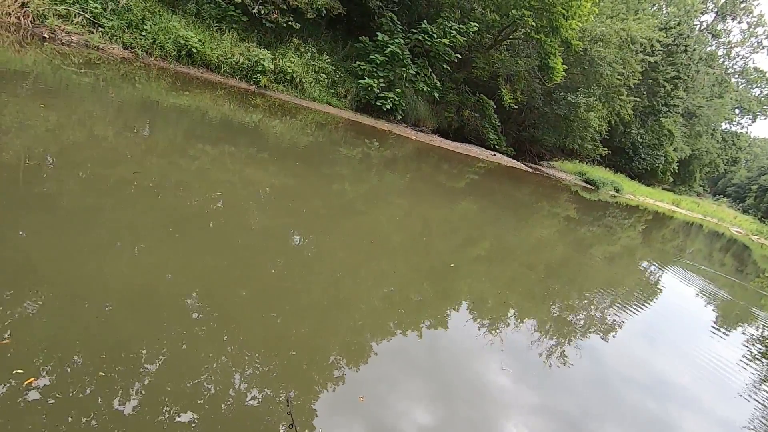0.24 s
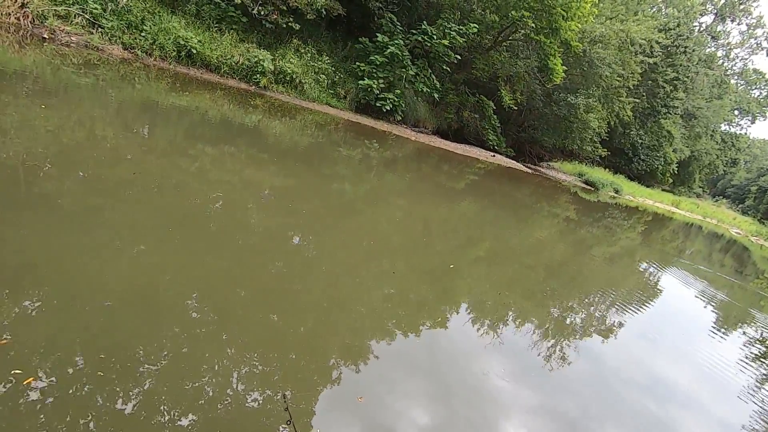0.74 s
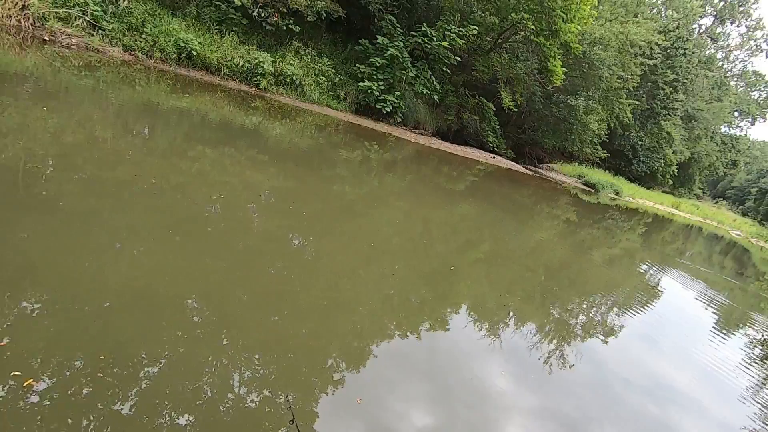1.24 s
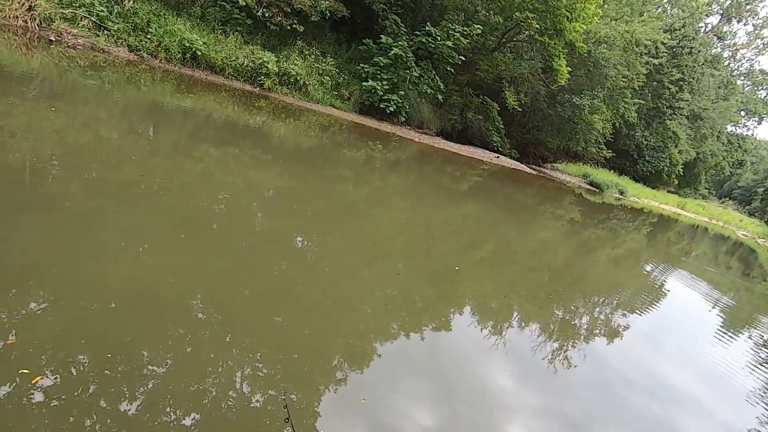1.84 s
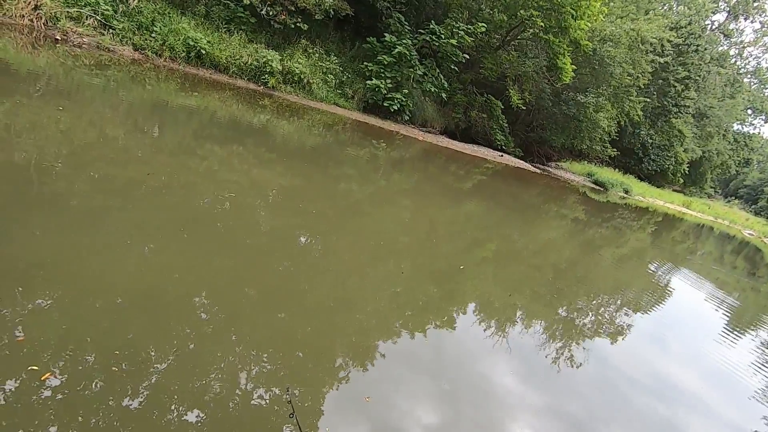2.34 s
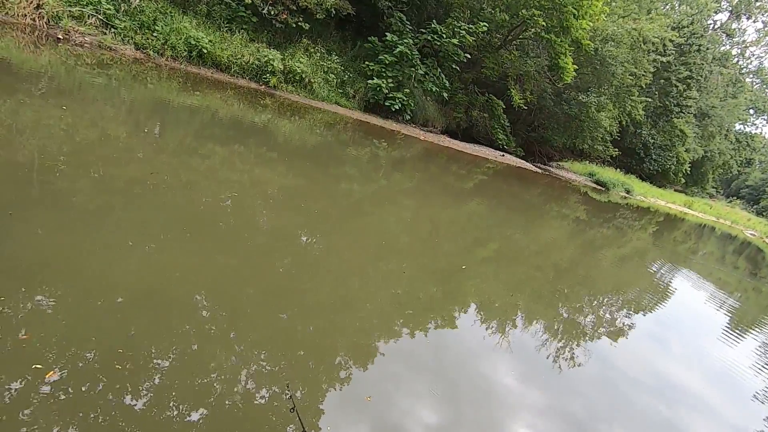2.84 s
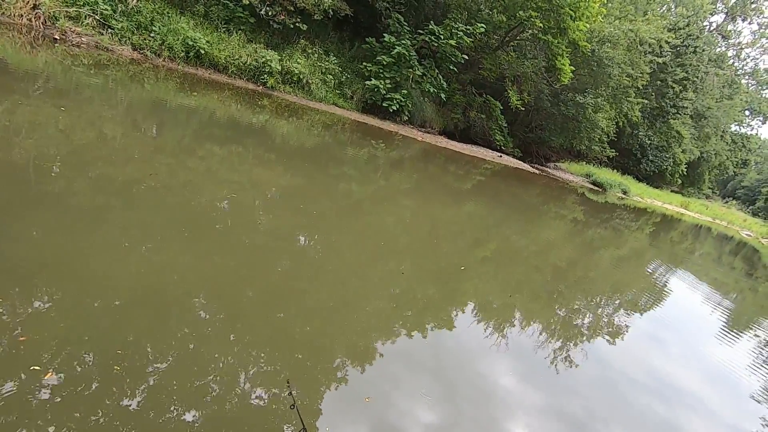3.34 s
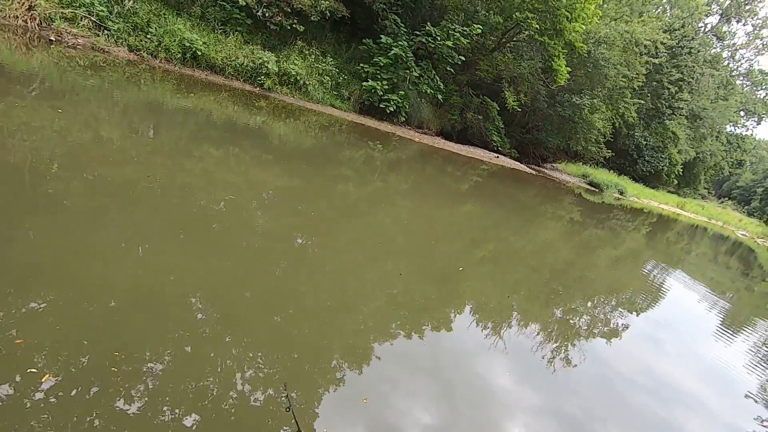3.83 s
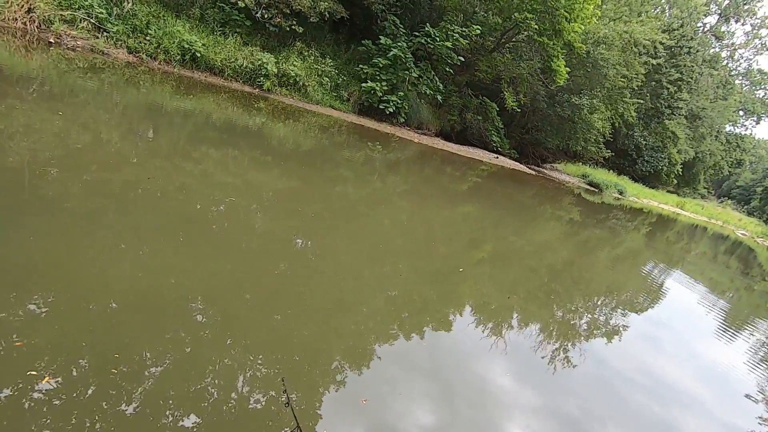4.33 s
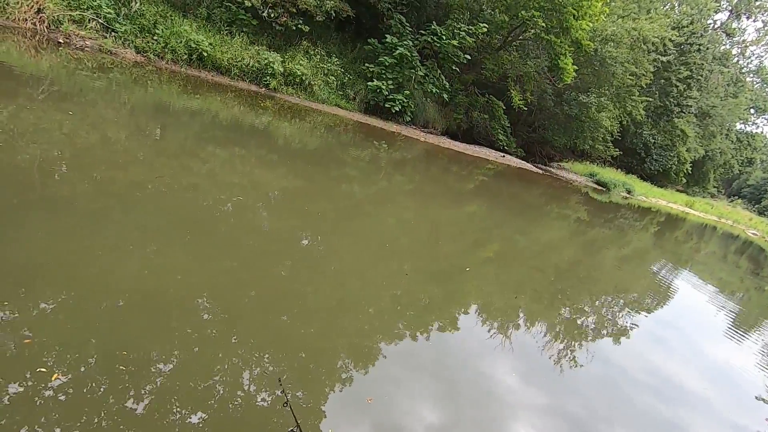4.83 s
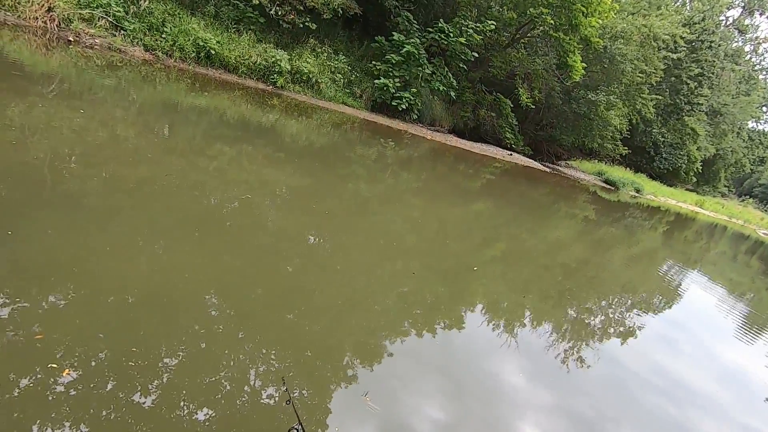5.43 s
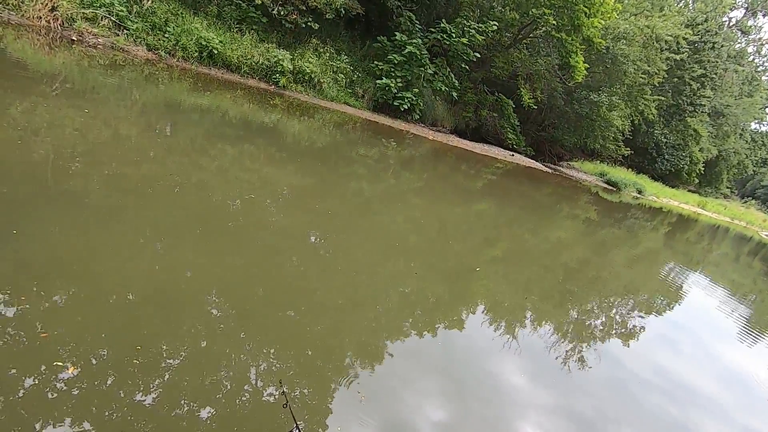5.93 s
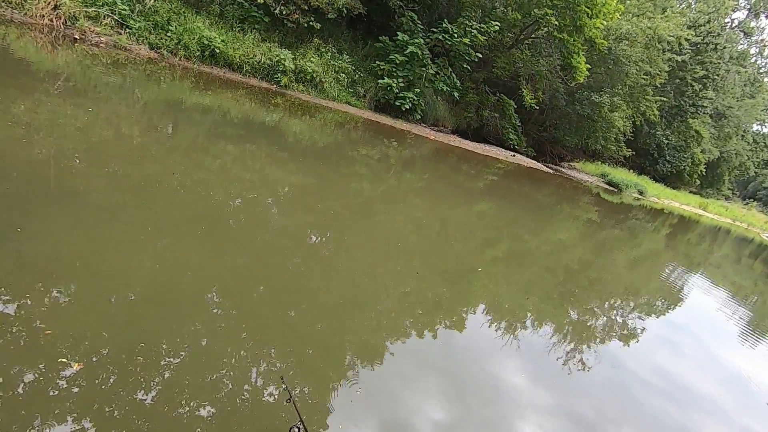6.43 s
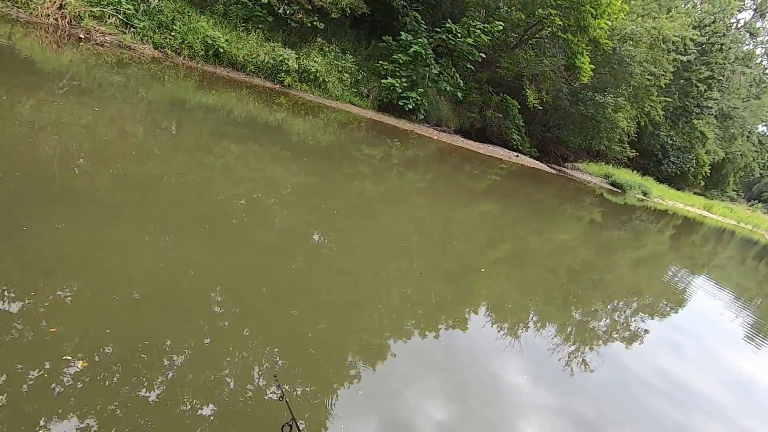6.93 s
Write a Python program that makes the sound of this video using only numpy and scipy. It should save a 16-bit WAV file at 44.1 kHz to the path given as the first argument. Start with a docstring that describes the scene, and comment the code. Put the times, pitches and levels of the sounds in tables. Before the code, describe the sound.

Steady high insect drone on a summer bank, with three raspy katydid buzzes, small bird whistles, a faint plop and a tiny tackle tick.

```python
"""Summer afternoon by a creek

A dense choir of crickets drones near 7.5 kHz, made of bands of noise that throb with the wing strokes.
A near katydid ticks and buzzes in bursts of noise; far katydids make a flickering hiss.
Small birds call in gliding sine tones, and a plop and a tiny tick are short sine tones too.
Far motors hum in wavering sines under the soft noise of breeze, rumble, roar and leaves.
Two closely spaced microphone ports hear it all, each a little differently."""
import sys
import numpy as np
from scipy import signal
from scipy.fft import rfft, irfft, next_fast_len
from scipy.io import wavfile
from scipy.ndimage import uniform_filter1d

SR = 44100
rng = np.random.default_rng(int(sys.argv[2]) if len(sys.argv) > 2 else 0)


def wav_record(signal):
    """Record a signal, one row per channel, as 16-bit PCM in the file named by sys.argv[1]."""
    frames = np.transpose(np.atleast_2d(signal))
    bounded = np.clip(frames, -1, 1)
    # unit amplitude maps onto the largest positive 16-bit level
    quanta = np.round(bounded * 32767).astype(np.int16)
    wavfile.write(sys.argv[1], SR, quanta)


N = 316197
TIME_S = np.arange(N) / SR
FFT_SIZE = next_fast_len(N)
HZ = np.maximum(np.fft.rfftfreq(FFT_SIZE, 1 / SR), 1)   # frequencies of the spectrum; 1 Hz at least

# In every spectrum below, each row: frequency in Hz, relative level in dB per Hz.

# How the two ports differ. Each row: frequency in Hz, likeness from 0 to 1,
# phase by which left leads in radians, left minus right in dB.
PORTS = [(25, 0.7, 1, -8), (105, 0.6, 1, 0), (335, 0.67, -0.4, -1.5), (745, 0.17, 0.93, -0.5),
         (1420, 0.37, 3, 3.5), (1980, 0.07, 5.5, 0.5), (2740, 0.48, 6.5, 0.5), (3570, 0.22, 7.5, 0),
         (3620, 0.2, 10, -1.5), (4570, 0.6, 6.5, 0), (5500, 0.22, 8.5, 2), (6300, 0.1, 10, 0),
         (7510, 0.37, 9.5, -1), (8350, 0.52, 9.5, -1.5), (8430, 0.32, 8.5, -1), (9080, 0.48, 9, -3),
         (10000, 0.45, 6, -1), (9970, 0.25, 8.5, 5), (11300, 0.4, 10.5, -3), (13200, 0.1, 15, 2),
         (14800, 0.5, 7, 1)]
ECHO_T60_S = .3   # echoes among the trunks fall 60 dB in this time

# Breeze on the ports: its spectrum, then its level. Each level row: time in s, level in dB.
BREEZE_SPECTRUM = [(12, -10), (24, -7), (35, 4), (50, -3), (80, -5)]
BREEZE_LEVEL = [(0, -74), (.7, -76), (1.4, -72), (3.4, -74), (4.4, -78), (5.7, -78), (6.6, -74),
                (7.17, -75)]
# Lumpy low rumble: its spectrum, then its level. Each level row: time in s, level in dB.
RUMBLE_SPECTRUM = [(40, -15), (70, -29), (130, -5.5), (200, 2), (260, -6), (380, -9.5), (600, -42)]
RUMBLE_LEVEL = [(0, -64.5), (.8, -66), (1.6, -64), (3.0, -63.5), (4.1, -61), (4.5, -63), (5.2, -64),
                (5.45, -59), (5.68, -55.5), (5.85, -63.5), (6.3, -60.5), (6.9, -64), (7.17, -60)]
# Far roar: its spectrum, then its swells. Each swell row: middle in s, spread in s, rise in dB.
ROAR_SPECTRUM = [(250, -10.5), (420, -3.5), (550, -2), (750, 1), (950, -3.5), (1300, -8.5), (2000, -42)]
ROAR_SWELLS = [(0.243, .15, 1), (1.53, 0.051, 2.5), (2.07, 0.059, 4), (2.817, 0.013, 6.5), (3.578, 0.07, 3),
               (3.99, 0.037, 3.5), (5.45, 0.085, 3.5), (5.617, 0.061, 1.5), (6.31, 0.036, 4),
               (6.698, .04, 2.5)]
ROAR_DB, ROAR_FOLLOWS = -63, 0.029   # mean level before the swells; share of the rumble's swings
# Spectrum of the rustling leaves.
RUSTLE_SPECTRUM = [(500, -11), (1000, -2), (1400, 2.5), (2280, -2), (3300, -1), (3850, 2.5), (4300, -2.5),
                   (4700, -4), (5600, -2.5), (6500, -16), (8000, -25)]
RUSTLE_DB, RUSTLE_RISE_DB_PER_S = -63, 0.39   # level at the start; the leaves slowly stir more
# Strongest puffs of air on the ports. Each row: middle in s, pitch in Hz, strength in dB.
THUDS = [(.4, 22, -61), (.88, 28, -59), (1.26, 22, -55), (1.52, 25, -55), (1.63, 27, -64), (2.32, 22, -65),
         (2.87, 25, -64), (3.32, 22, -57), (3.43, 22, -58), (3.76, 27, -58), (4.1, 22, -60),
         (4.73, 24, -61), (5.21, 32, -61), (5.35, 28, -66), (6.24, 27, -61)]
THUD_S = 0.043   # spread of each puff

# Plain motor tones. Each row: pitch in Hz, pitch waver in Hz, level waver in dB,
# level at the start in dB, change in dB per s.
HUM = [(183.8, 2.4, 4.5, -73.5, 0.5)]
# Level of a lower motor that fades away. Each row: time in s, level in dB.
LOW_HUM_LEVEL = [(0, -70.5), (.4, -70), (.65, -65.5), (1.0, -69.5), (1.65, -67), (2.15, -70), (2.65, -66),
                 (3.4, -78.5), (4.5, -73.5), (5.5, -85), (7.17, -84)]
LOW_HUM_HZ, LOW_HUM_WAVER_HZ, LOW_HUM_WAVER_DB = 106.4, 0.7, 2.0
# Level of a thin high motor tone. Each row: time in s, level in dB.
HIGH_HUM_LEVEL = [(0, -70.5), (.35, -71.5), (.75, -86), (1.0, -75), (1.6, -76), (1.85, -82), (2.15, -83),
                  (2.5, -82), (7.17, -87)]
HIGH_HUM_HZ, HIGH_HUM_WAVER_HZ, HIGH_HUM_WAVER_DB = 462, 1.0, 1.2
# Level of the loudest motor. Each row: time in s, level in dB.
DRONE_LEVEL = [(0, -69.5), (1.0, -72.5), (1.3, -60), (2.15, -66), (2.7, -62.5), (3.6, -61), (4.1, -58),
               (5.4, -59.5), (6.4, -64.5), (6.8, -69.5), (7.17, -67)]
DRONE_HZ, DRONE_WAVER_HZ, DRONE_WAVER_DB = 156.6, 0.27, 2
# Tones of a chugging engine. Each row: multiple of its cycle, relative level in dB.
CHUG_ORDERS = [(5.0, -7), (6.0, 0), (7.0, -4)]
# Level shared by those tones. Each row: time in s, level in dB.
CHUG_LEVEL = [(0, -77), (1.4, -68), (2.4, -79), (3.4, -81), (4.6, -74), (6.0, -83), (6.5, -73.5),
              (6.85, -65.5), (7.17, -71.5)]
CYCLE_HZ, CYCLE_WAVER_HZ = 13.0, 0.048

# Small plop in the water: start in s, length in s, first pitch in Hz, last pitch in Hz, level in dB.
PLOP = (6.03, 0.05, 620, 900, -62)
# Plop at the ports. Each row: pitch in Hz, phase by which left leads in radians, left minus right in dB.
PLOP_PORTS = [(620, .8, 0), (900, 1.1, 0)]
# Faint tick of the tackle, to the right: middle in s, pitch in Hz, spread in s,
# left peak in dB, right peak in dB.
TACKLE = (6.8125, 4850, .0012, -62, -55)

# Far katydids, lower singers. Each row: time in s, level in dB.
FAR_KATYDID_LEVEL = [(0, -65), (.3, -68), (.9, -70), (2.1, -65.5), (2.35, -69.5), (2.54, -74), (2.8, -69),
                     (3.07, -65.5), (3.3, -67), (3.45, -74), (4.0, -70), (5.0, -68.5), (7.17, -70)]
# Spectrum of all the far katydids.
FAR_KATYDID_SPECTRUM = [(9300, -29), (9800, -7), (10600, 4.5), (11000, -1), (11800, 2.5), (12600, -2.5),
                        (13600, -4), (14800, -31)]
HIGHER_DB, HIGHER_FOLLOW = -70, 0.54   # higher singers: mean level, share of the lower ones' swings

# Steady peeps of a far bird. Each row: start in s, length in s, first pitch in Hz,
# last pitch in Hz, level in dB.
PEEPS = [(3.425, .06, 4690, 4685, -74), (3.487, .045, 4695, 4680, -71), (3.548, .03, 4880, 4890, -75),
         (3.6, .09, 4893, 4898, -65.5), (4.294, .028, 4825, 4840, -68.5)]
RISE_SHARE, FALL_SHARE, EDGE_DB = .4, .25, -10   # fade in and out over these shares of the length
# A falling chip. Each row: time in s, pitch in Hz, level in dB.
CHIP = [(2.401, 6150, -70), (2.406, 5930, -60), (2.412, 5620, -58), (2.42, 5200, -54), (2.425, 4880, -59),
        (2.429, 4420, -64), (2.433, 4000, -74)]
# Another bird's song of two joined notes, one list per note. Each row: time in s, pitch in Hz, level in dB.
SONG = [
    [(6.114, 3980, -70), (6.126, 4300, -67), (6.14, 4540, -67), (6.155, 4630, -59), (6.168, 4420, -63),
     (6.18, 4100, -68), (6.184, 4500, -74), (6.2, 4520, -69), (6.215, 4420, -72)],
    [(6.217, 4180, -68), (6.23, 4430, -64), (6.25, 4655, -57), (6.265, 4735, -63), (6.29, 4755, -68.5),
     (6.32, 4760, -71), (6.355, 4770, -67), (6.395, 4640, -72), (6.415, 4252, -73), (6.432, 4040, -66),
     (6.447, 3960, -67), (6.462, 3800, -64), (6.48, 3745, -64), (6.525, 3725, -63), (6.565, 3773, -63),
     (6.595, 3897, -69), (6.63, 4050, -65), (6.66, 4095, -66), (6.72, 4105, -71), (6.765, 4200, -70),
     (6.795, 4230, -68.5), (6.85, 4225, -73), (6.93, 4260, -80)],
]
# Peeps, chip and song at the ports. Each row: pitch in Hz, phase by which left leads in radians,
# left minus right in dB.
PEEP_PORTS = [(4690, 1, 9), (4890, .5, 4)]
CHIP_PORTS = [(4000, -1.6, -2), (5000, -2.2, -2), (6200, -1.9, -3)]
SONG_PORTS = [(3730, 2.3, 3), (3800, 2.5, -3), (3950, 3.9, 0), (4060, 4.7, 5), (4210, 6.5, 4),
              (4430, 5.0, 0), (4620, 7.3, 4.5), (4770, 4.9, 7)]

# Single ticks of the near katydid. Each row: middle in s, level in dB, extra treble in dB.
TICKS = [(.817, -62, 0), (.885, -57, 1), (.95, -56, 0), (1.018, -58, 0), (2.451, -67, -2), (2.521, -64, 0),
         (2.76, -69, 0), (2.846, -69, 0), (3.481, -61, 0), (3.55, -56.5, -1), (3.618, -55.5, -2),
         (3.688, -57, 0), (5.55, -71, 3), (5.792, -58.5, -5), (5.853, -57, -4), (5.913, -58, -5)]
TICK_TREBLE_HZ = 11300   # a tick's treble starts here
# Long buzzes. Each row: start in s, end in s, level in dB before strokes and fades,
# wing resonance in Hz.
BUZZES = [(1.063, 2.05, -56.5, 10500), (3.753, 4.933, -56.5, 10600), (5.938, 7.097, -57, 10550)]
# Spectrum of the katydid's wing.
WING_SPECTRUM = [(9000, -8), (9400, -1), (9700, -11), (10050, 1), (10400, -1), (10900, -0.5), (11300, -3.5),
                 (11700, -8), (12300, -5.5), (13000, -8), (13900, -13), (14800, -49)]
SWELL_DB, SWELL_S, STOP_S = 14, 0.09, 0.024   # start this much softer, swell time constant, stopping time
STROKES_PER_S, TIRE_PER_S, TIRE_S, TIRE_DB = 47.8, 2.0, .15, 1.5   # wings slow and soften near the end
RING_HZ_WIDE, RING_DB = 70, 6   # spread and height of the wing resonance

# Cricket choir. Each row: time in s, level in dB.
CHOIR_LEVEL = [(0, -39.5), (3.0, -40), (3.2, -39), (3.6, -40), (5.2, -39), (6.8, -39.5), (7.17, -38.5)]
# Spectrum of the cricket choir.
CHOIR_SPECTRUM = [(5800, -33), (6320, -24), (6700, -13), (7060, -1.5), (7300, 2.5), (7550, 3), (7780, 5.5),
                  (7960, 0), (8080, -5), (8230, -3.5), (8450, -13), (8800, -13.5), (9100, -17),
                  (9300, -34.5), (9600, -46)]
CHIRP_HZ, CHIRP_WAVER_HZ = 47, 0.8   # wing strokes per second that the singers share

# Spectrum of the microphone hiss.
MIC_HISS_SPECTRUM = [(8000, -5), (12000, -3), (14500, 18), (17000, -21)]
MIC_HISS_DB, CUTOFF_HZ = -81.5, 15750


def amp(db):
    """Turn dB into a plain gain."""
    return 10 ** (np.asarray(db) / 20)


def in_time(rows):
    """Draw each column of a time table as a curve with a value at every sample."""
    s, *columns = np.transpose(rows)
    return [np.interp(TIME_S, s, column) for column in columns]


def on_hz(points):
    """Draw each column of a frequency table as a curve over log frequency."""
    hz, *columns = np.transpose(points)
    return [np.interp(np.log(HZ), np.log(hz), column) for column in columns]


def closed(points):
    """Gain of a spectrum that is silent outside its ends."""
    return amp(on_hz(points)[0]) * (HZ >= points[0][0]) * (HZ <= points[-1][0])


def drift(rate):
    """Smoothed chance wandering around 0 with spread 1; a higher rate (Hz) wanders faster."""
    step = 40   # worked out once per 40 samples, then joined by straight lines
    pole = np.exp(-2 * step * np.pi * rate / SR)
    chance = rng.standard_normal(N // step + 2002)
    slow = signal.lfilter([1], [1, -2 * pole, pole * pole], chance)[2000:]   # skip the filter's start
    return np.interp(np.arange(N) / step, np.arange(len(slow)), slow / slow.std())


def strokes(per_s, depth, start):
    """Wing strokes as a throbbing gain: depth 0 is steady, 1 falls silent between strokes."""
    depth = np.clip(depth, 0, 1)
    return 1 - depth + depth * np.sin(np.pi * (start + np.cumsum(per_s) / SR)) ** 2


def at_ports(gain, colour):
    """Coloured noise at both ports: a shared part with a phase lead, and a part of the right port's own."""
    alike, lead, balance_db = on_hz(PORTS)
    alike = np.clip(alike, 0, 1)
    even_colour = colour / np.sqrt(np.mean(colour ** 2))   # colour must not alter the level
    left, other = rfft(gain * rng.standard_normal((2, N)), FFT_SIZE) * even_colour
    right = alike * np.exp(-1j * lead) * left + np.sqrt(1 - alike ** 2) * other
    return irfft([left * amp(balance_db / 2), right * amp(-balance_db / 2)], FFT_SIZE)[:, :N]


def trees(x, t60, wet_db):
    """Trunks and banks scatter a sound back as a dense dying tail, different at each port."""
    t = np.arange(SR // 2) / SR
    tail = rng.standard_normal((2, len(t))) * amp(-60 * t / t60) * np.minimum(t / 0.00037, 1)
    tail = tail / np.sqrt(np.sum(tail ** 2, axis=1, keepdims=True))
    return x + amp(wet_db) * signal.fftconvolve(x, tail, axes=1)[:, :N]


def glide(start, length, first_hz, last_hz, level_db):
    """A short note as a curve: fade in, hold, fade out, on a straight slide in pitch."""
    shape = ((0, EDGE_DB), (RISE_SHARE, 0), (1 - FALL_SHARE, 0), (1, EDGE_DB))
    return [(start + k * length, first_hz + k * (last_hz - first_hz), level_db + db) for k, db in shape]


def whistle(note, waver_hz, ports):
    """A gliding sine; its phase and balance at the ports go with its pitch."""
    hz, level_db = in_time(note)
    hz = uniform_filter1d(hz, size=100) + waver_hz   # round the corners of the glide
    at, lead, balance_db = np.transpose(ports)
    sides = np.array([[.5], [-.5]])
    phase = 2 * np.pi * np.cumsum(hz) / SR + sides * np.interp(hz, at, lead)
    gain = amp(level_db + sides * np.interp(hz, at, balance_db))
    sounding = (TIME_S >= note[0][0]) * (TIME_S <= note[-1][0])
    return sounding * np.sqrt(2) * gain * np.sin(phase)


def hush(puff_db, gust_db, puff_alike):
    """Breeze puffs partly opposite at the two ports; rumble and far roar lie under rustling leaves."""
    puffs = amp(in_time(BREEZE_LEVEL)[0] + puff_db * drift(6.5))
    opposite = at_ports(puffs, closed(BREEZE_SPECTRUM)) * [[1], [-1]]
    breeze = at_ports(puffs, closed(BREEZE_SPECTRUM)) + np.clip(1 - puff_alike, 0, 1) * opposite

    rumble_db, = in_time(RUMBLE_LEVEL)
    rumble = at_ports(amp(rumble_db + gust_db * drift(5.5)), closed(RUMBLE_SPECTRUM))

    roar_db = ROAR_DB + ROAR_FOLLOWS * (rumble_db - rumble_db.mean())
    for s, spread, rise_db in ROAR_SWELLS:
        roar_db = roar_db + rise_db * np.exp(-((TIME_S - s) / spread) ** 2)
    roar = at_ports(amp(roar_db + .4 * drift(7.0)), closed(ROAR_SPECTRUM))

    rustle_db = RUSTLE_DB + RUSTLE_RISE_DB_PER_S * TIME_S
    rustle = at_ports(amp(rustle_db + 0.65 * drift(25.0)), closed(RUSTLE_SPECTRUM))
    return breeze + rumble + roar + rustle


def thuds():
    """Each puff of air pushes the ports through a few low swings, not quite in step with each other."""
    out = 0
    for (s, hz, strength_db), side in zip(THUDS, rng.standard_normal((len(THUDS), 2, 1))):
        t = TIME_S - s
        push = np.exp(-(t / THUD_S) ** 2) * np.sin(2 * np.pi * hz * t + 0.45 * side)
        out = out + amp(strength_db) * push
    return out


def motors():
    """Far motors as sine tones whose pitch and level waver, a little stronger on the right."""
    tones = [(hz, waver_hz, waver_db, db + slope * TIME_S) for hz, waver_hz, waver_db, db, slope in HUM]
    tones += [(LOW_HUM_HZ, LOW_HUM_WAVER_HZ, LOW_HUM_WAVER_DB, *in_time(LOW_HUM_LEVEL)),
              (HIGH_HUM_HZ, HIGH_HUM_WAVER_HZ, HIGH_HUM_WAVER_DB, *in_time(HIGH_HUM_LEVEL)),
              (DRONE_HZ, DRONE_WAVER_HZ, DRONE_WAVER_DB, *in_time(DRONE_LEVEL))]
    out = 0
    for hz, waver_hz, waver_db, level_db in tones:
        turns = np.cumsum(hz + waver_hz * drift(2.18)) / SR
        out = out + np.sqrt(2) * amp(level_db + waver_db * drift(10.3)) * np.sin(2 * np.pi * turns)
    return out * amp([[-.6], [.6]])


def chug(waver_db):
    """Neighbouring multiples of one engine cycle stay in step, so they beat once a cycle."""
    turns = np.cumsum(CYCLE_HZ + CYCLE_WAVER_HZ * drift(0.83)) / SR + rng.random()
    tones = 0
    for multiple, db in CHUG_ORDERS:
        gain = np.sqrt(2) * amp(db + waver_db * drift(3.3))
        tones = tones + gain * np.sin(2 * np.pi * multiple * turns)
    return amp(in_time(CHUG_LEVEL)[0]) * tones


def plop():
    """A small plop in the water: one short sine that slides upwards."""
    return whistle(glide(*PLOP), 0, PLOP_PORTS)


def tackle():
    """One tiny hard tick: a sine that lasts only a few cycles."""
    s, hz, spread, *peak_db = TACKLE
    t = TIME_S - s
    return amp(peak_db)[:, None] * np.exp(-(t / spread) ** 2) * np.sin(2 * np.pi * hz * t)


def far_katydids(flicker_db, split_hz):
    """Many distant wings melt into a hiss; lower and higher singers flicker apart."""
    high = 1 / (1 + (split_hz / HZ) ** 20)
    colour = closed(FAR_KATYDID_SPECTRUM)
    lower_db, = in_time(FAR_KATYDID_LEVEL)
    higher_db = HIGHER_DB + HIGHER_FOLLOW * (lower_db - lower_db.mean())
    lower = at_ports(amp(lower_db + flicker_db * drift(31)), colour * np.sqrt(1 - high))
    higher = at_ports(amp(higher_db + flicker_db * drift(31)), colour * np.sqrt(high))
    return lower + higher


def birds(flutter_db, waver_hz, song_wet_db, wet_db):
    """Whistles flutter through the leaves; the song also wavers in pitch and echoes a bit more."""
    flutter = amp(flutter_db * (drift(60) + .6 * np.array([drift(25), drift(25)])))
    waver = waver_hz * (drift(25) + drift(120))
    husk = amp(1.8 * np.array([drift(110), drift(110)]))   # fast level changes make a husky tone
    gaps = amp(-1.5 + 1.8 * np.array([drift(18), drift(18)]))   # moving leaves partly hide the singer
    song = husk * gaps * sum(whistle(note, waver, SONG_PORTS) for note in SONG)
    peeps = sum(whistle(glide(*call), 0, PEEP_PORTS) for call in PEEPS)
    chip = husk * whistle(CHIP, 0, CHIP_PORTS)
    peeps_and_chip = trees(flutter * (peeps + chip), ECHO_T60_S, wet_db)
    return trees(flutter * song, ECHO_T60_S, song_wet_db) + peeps_and_chip


def katydid_ticks(teeth, tick_s):
    """Each tick is one short wing stroke of noise, with its own treble, echoed by the trees."""
    wing = closed(WING_SPECTRUM)
    low, high = 0, 0
    for s, db, lift_db in TICKS:
        stroke = np.exp(-((TIME_S - s) / tick_s) ** 2)
        low = low + amp(db) * stroke
        high = high + amp(db + lift_db) * stroke
    ticks = 0
    for gain, part in ((low, HZ < TICK_TREBLE_HZ), (high, HZ >= TICK_TREBLE_HZ)):
        share = np.sqrt(np.mean((wing * part) ** 2) / np.mean(wing ** 2))
        ticks = ticks + at_ports(gain * teeth, wing * part) * share
    return trees(ticks, ECHO_T60_S, wet_db=-5.0)


def katydid_buzzes(teeth, depth):
    """A buzz is a run of wing strokes that swells, tires and stops, coloured by a wing resonance."""
    out = 0
    for start, end, level_db, ring_hz in BUZZES:
        sounding = (TIME_S >= start) & (TIME_S <= end)
        tired = np.exp(np.minimum(TIME_S - end, 0) / TIRE_S)   # grows to 1 at the end
        swell_db = -SWELL_DB * np.exp(-np.maximum(TIME_S - start, 0) / SWELL_S)
        stop = np.clip((end - TIME_S) / STOP_S, 0, 1) ** 2
        wings = strokes((STROKES_PER_S - TIRE_PER_S * tired) * sounding, depth, 0)
        level = amp(level_db + swell_db - TIRE_DB * tired + 0.94 * drift(12))
        ring = amp(RING_DB * np.exp(-((HZ - ring_hz) / RING_HZ_WIDE) ** 2))
        out = out + at_ports(sounding * level * stop * wings * teeth, closed(WING_SPECTRUM) * ring)
    return out


def katydid(depth, tick_s):
    """Wing teeth scrape: a fast random flicker makes every tick and buzz grainy."""
    teeth = amp(1.0 * drift(400))
    return katydid_ticks(teeth, tick_s) + katydid_buzzes(teeth, depth)


def crickets(depth, count):
    """Groups of singers share out the band as noise and throb nearly in step."""
    colour = closed(CHOIR_SPECTRUM)
    centres = np.linspace(5600, 9800, count)
    per_s = CHIRP_HZ + CHIRP_WAVER_HZ * drift(0.69)
    out = 0
    for hz, lag in zip(centres, rng.normal(0, 0.059, count)):   # lag in strokes
        distance = np.clip((HZ - hz) / (centres[1] - centres[0]), -1, 1)
        share = colour * np.cos(np.pi / 2 * distance)   # neighbouring groups overlap smoothly
        gain = strokes(per_s, depth, lag)
        out = out + at_ports(gain, share) * np.sqrt(np.mean(share ** 2) / np.mean(gain ** 2))
    return amp(in_time(CHOIR_LEVEL)[0]) * out / np.sqrt(np.mean(colour ** 2))


def scene():
    """Add up all the sources at the two ports."""
    far = hush(puff_db=4.5, gust_db=2.06, puff_alike=0.65) + thuds() + motors() + chug(waver_db=5.5)
    small = plop() + tackle()
    calls = birds(flutter_db=1.0, waver_hz=18, song_wet_db=-7.0, wet_db=-8.0)
    insects = far_katydids(flicker_db=1.4, split_hz=10500) + katydid(depth=0.49, tick_s=0.011)
    return far + small + calls + insects + crickets(depth=0.15, count=14)


def record(dry):
    """The microphones add a faint high hiss; the top is cut steeply."""
    heard = dry + at_ports(amp(MIC_HISS_DB), closed(MIC_HISS_SPECTRUM))
    return signal.sosfilt(signal.ellip(14, .5, 60, CUTOFF_HZ, fs=SR, output="sos"), heard)


dry = scene()
out = record(dry)
wav_record(out)
```